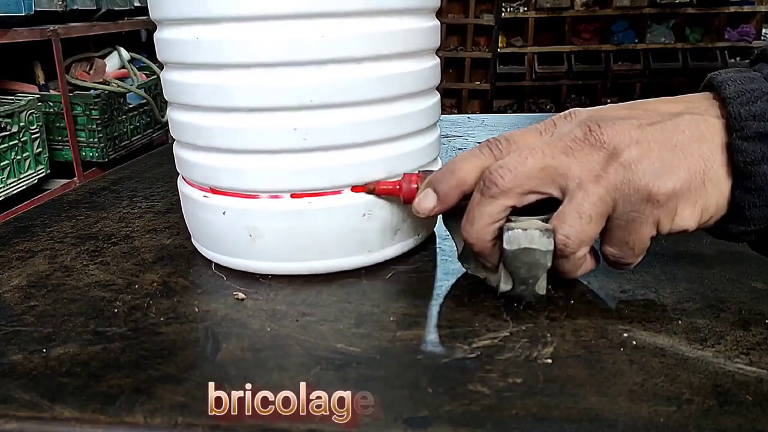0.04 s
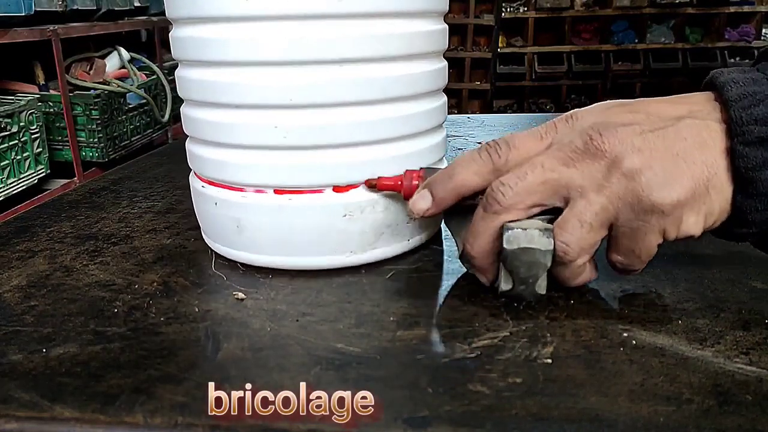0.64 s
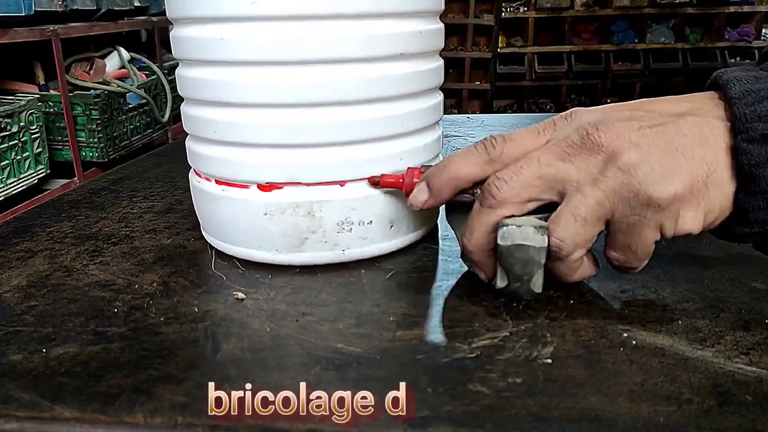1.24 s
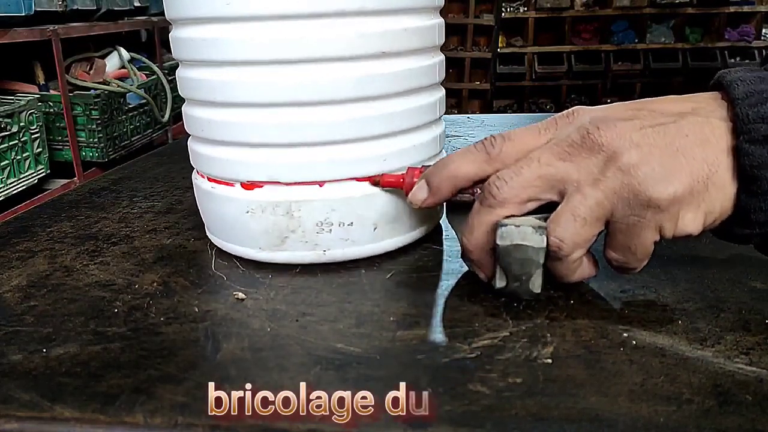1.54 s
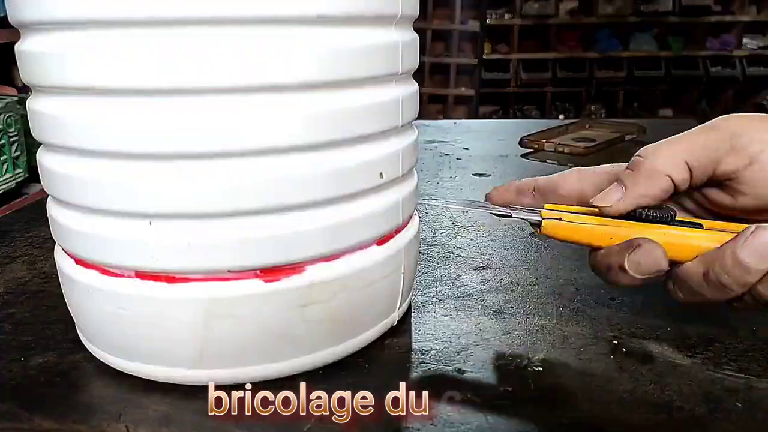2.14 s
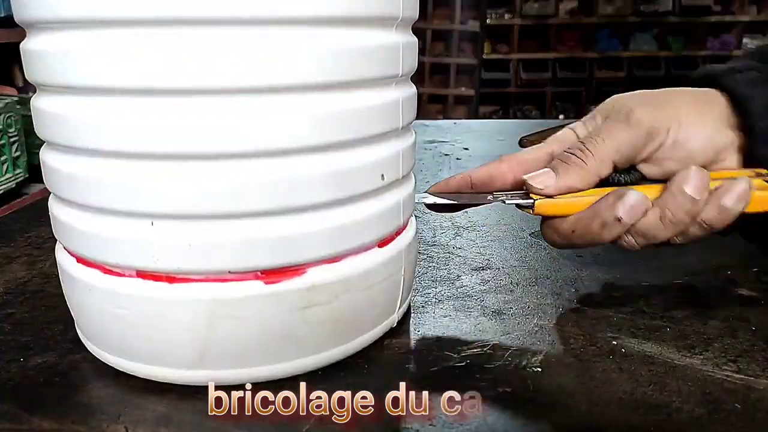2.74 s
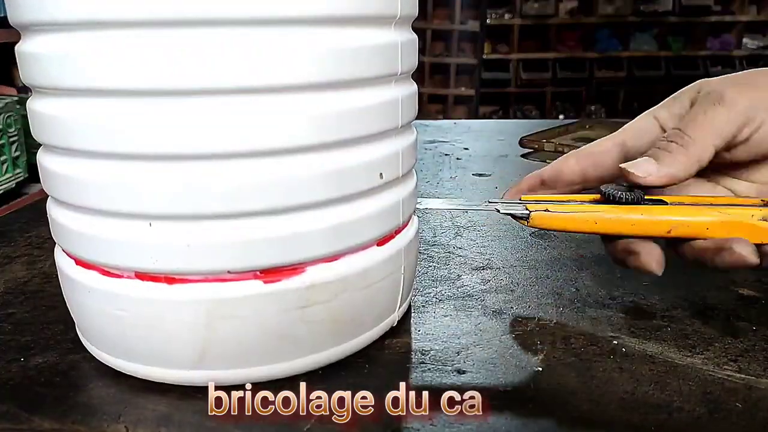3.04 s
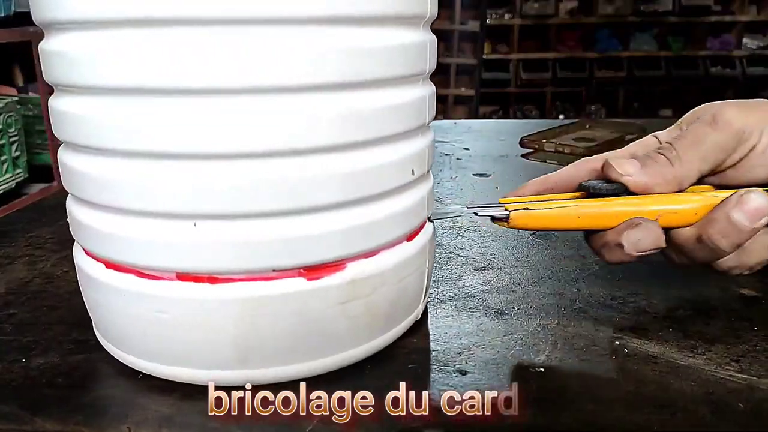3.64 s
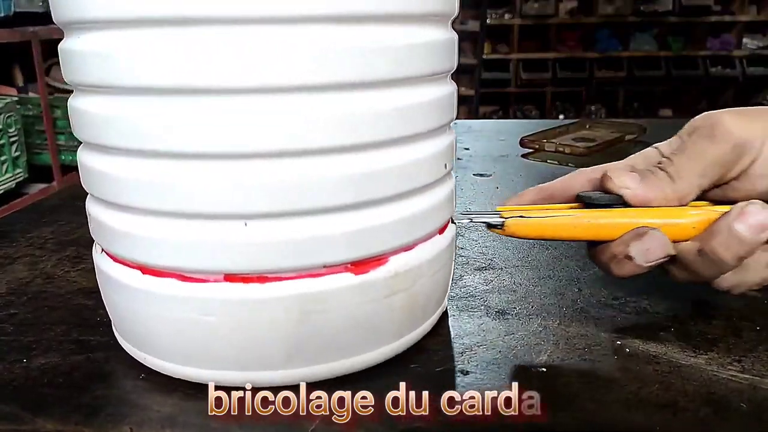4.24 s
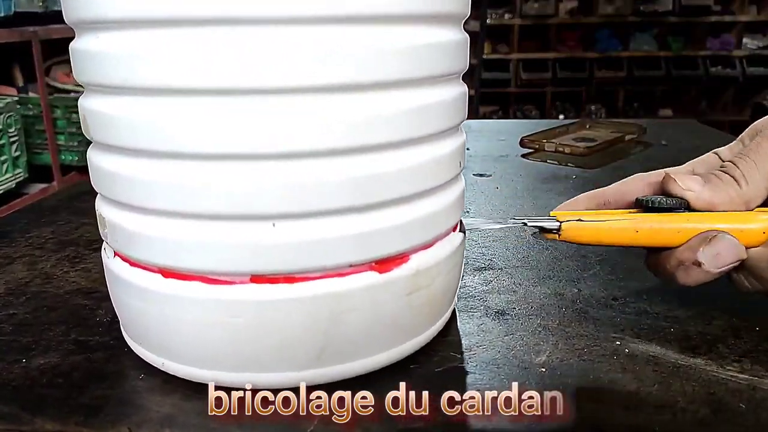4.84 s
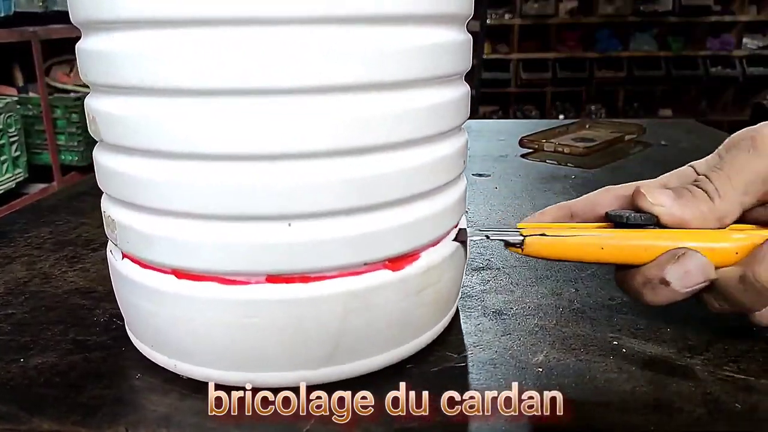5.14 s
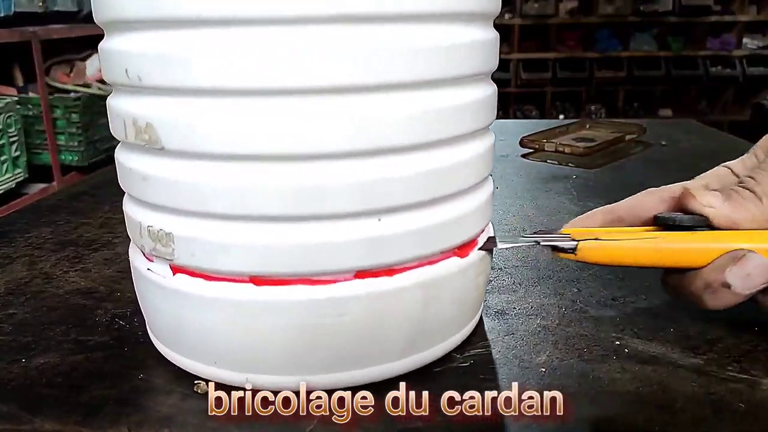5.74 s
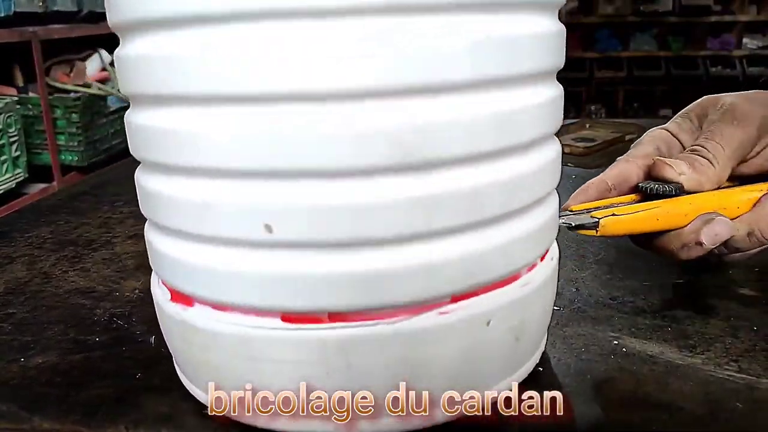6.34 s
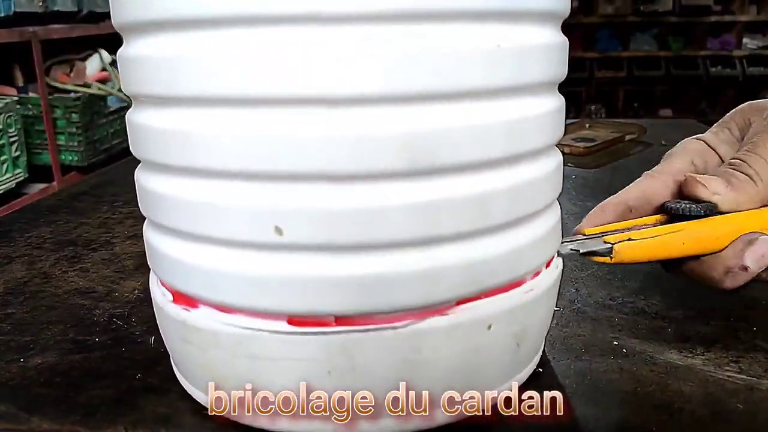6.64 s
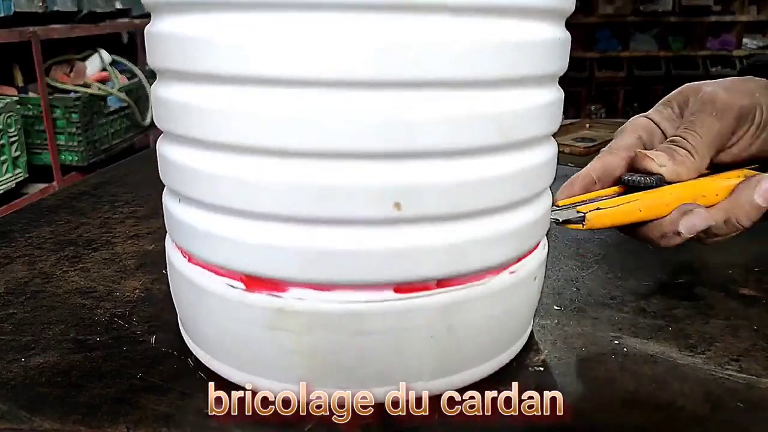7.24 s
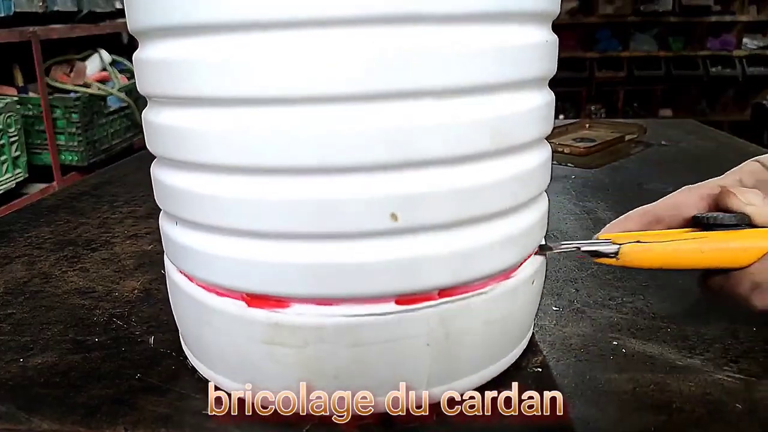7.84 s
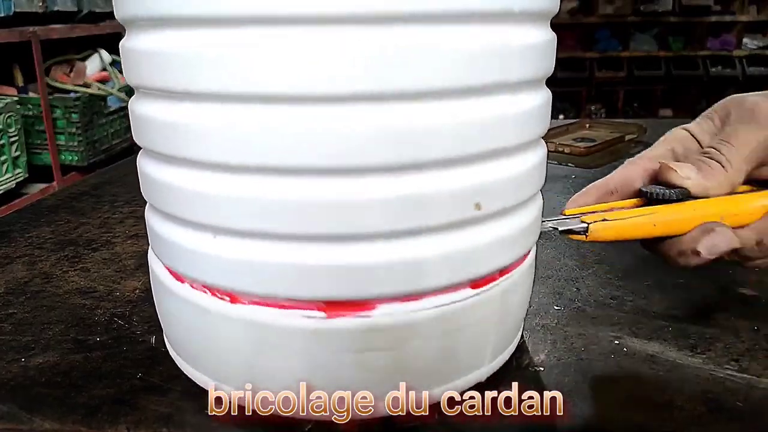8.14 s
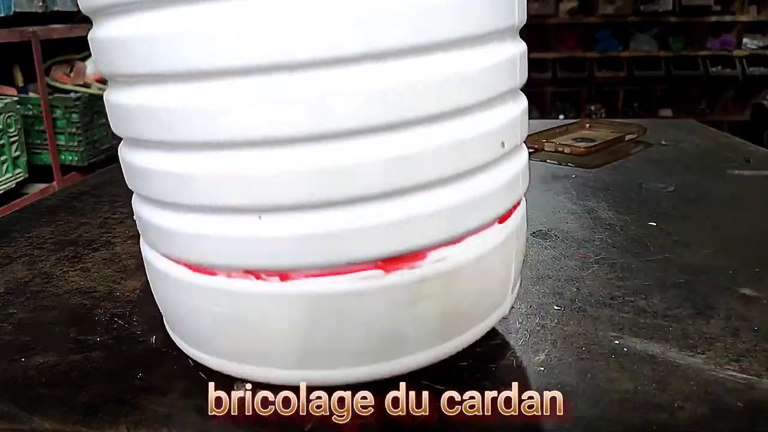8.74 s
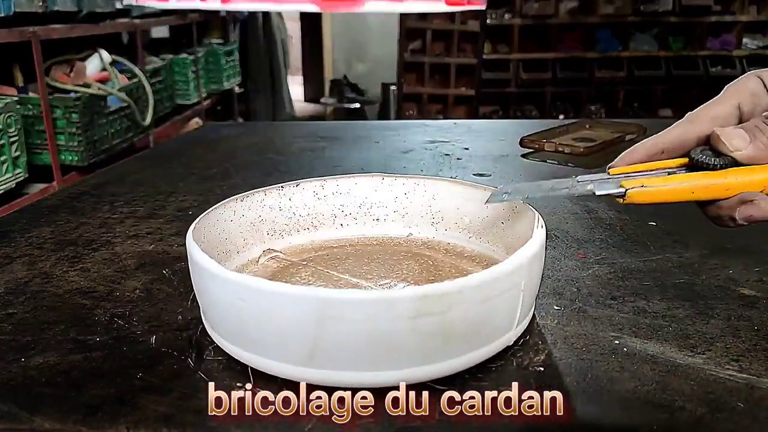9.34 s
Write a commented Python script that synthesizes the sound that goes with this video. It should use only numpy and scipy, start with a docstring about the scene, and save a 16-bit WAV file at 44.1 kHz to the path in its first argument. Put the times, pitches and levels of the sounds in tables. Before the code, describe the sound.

Soft felt-tip strokes on a large plastic bottle give way to a knife scraping and cutting its wall, which crackles and snaps.

```python
"""Soft felt-tip strokes rub round a large ribbed plastic bottle on a workbench; then a utility knife
pierces the wall and saws along the drawn line. The taut wall rings near 1 kHz under quick short
strokes; once the slit opens it goes slack, rings lower and snaps against the blade. The last bridge
cracks through and the top rings hollow as it is lifted off its base. Marker and blade drive the wall's
resonances with tiny slips and kicks, while their friction and cracks reach the ear directly."""
import sys
import numpy as np
from scipy import signal
from scipy.fft import rfft, irfft, next_fast_len
from scipy.io import wavfile
from scipy.ndimage import uniform_filter1d

SR = 44100
rng = np.random.default_rng(int(sys.argv[2]) if len(sys.argv) > 2 else 0)


def persist_wave(psi):
    """Save psi, clipped to +-1, as 16-bit WAV."""
    counts = np.round(np.clip(psi, -1, 1) * 32767).astype(np.int16)
    wavfile.write(sys.argv[1], SR, np.atleast_2d(counts).T)


N = 414099
TIME = np.arange(N) / SR
FFT_SIZE = next_fast_len(N + SR)
HZ = np.maximum(np.arange(FFT_SIZE // 2 + 1) * SR / FFT_SIZE, 1)
KNIFE_FROM_S, SLACK_FROM_S = 2.315, 6.115
CUTOFF_HZ = 16400
HIT_GAIN = np.sqrt(SR / 100)   # gives a unit-energy hit the energy of 10 ms at unit power
# stereo width: f/Hz, side relative to mid/dB
STEREO_WIDTH = [(50, -10.5), (200, -11), (650, -11.5), (1300, -7), (2600, -4), (5000, -1), (14000, -1.5)]


def from_db(db):
    """Decibels to gain."""
    return 10 ** (np.asarray(db) / 20)


def rms_one(x):
    """Scale to unit power."""
    return x / np.sqrt(np.mean(np.abs(x) ** 2) + 1e-20)


def at_hz(points, hz):
    """Read a spectrum on a log-frequency axis."""
    f, level = np.transpose(points)
    return np.interp(np.log(hz), np.log(f), level)


def causal(level_db):
    """Minimum-phase response with this magnitude: nothing sounds early."""
    cepstrum = irfft(np.log(from_db(level_db)))
    half = len(cepstrum) // 2
    cepstrum[1:half] *= 2
    cepstrum[half + 1:] = 0
    return np.exp(rfft(cepstrum))


def through(x, response):
    """Filter a whole track."""
    return irfft(rfft(x, FFT_SIZE) * response, FFT_SIZE)[..., :N]


def coloured(x, spectrum):
    """EQ a track; a white input keeps its power."""
    return through(x, rms_one(causal(at_hz(spectrum, HZ))))


def dying(t60, count):
    """Envelope that falls 60 dB in t60 seconds."""
    return from_db(-60 * np.arange(count) / SR / t60)


def add(track, s, burst):
    """Mix a burst into a track at s seconds."""
    i = max(round(s * SR), 0)
    track[..., i:i + burst.shape[-1]] += burst[..., :max(N - i, 0)]


def ears(mid, side, hz):
    """Left and right spectra: alike in the bass, wider in the treble."""
    width = from_db(at_hz(STEREO_WIDTH, hz))
    return mid + side * width * np.array([[1], [-1]])


def narrow_noise(centre_hz, width_hz, db):
    """Noise held in one resonance."""
    band = 1 / (1 + ((HZ - centre_hz) / (width_hz / 2)) ** 2)
    return from_db(db) * rms_one(through(rng.standard_normal(N), band))


def room_tone():
    """Quiet workshop air; hissier during the first cut, with a faint hum and a passing thin hiss."""
    # colour of the air before and after the first cut: f/Hz, level/dB
    dark_eq = [(30, -5.5), (75, 0), (150, -5), (300, -4.5), (700, -0.5), (1200, -4), (2400, -7),
               (3200, -10), (7000, -15), (13000, -18), (16000, -29)]
    # its colour during that cut: f/Hz, level/dB
    hissy_eq = [(30, -18), (60, -5.5), (125, 0.5), (200, -6.5), (350, -11), (560, -12), (750, -4),
                (1100, -5), (1500, -3), (2200, -4), (10000, -9), (15500, -11.5)]
    mid, side = rfft(rng.standard_normal((2, N)), FFT_SIZE)
    noise = irfft(ears(mid, side, HZ), FFT_SIZE)[:, :N]
    first_cut = (TIME >= KNIFE_FROM_S) & (TIME < SLACK_FROM_S)
    dark = from_db(-69) * coloured(noise * ~first_cut, dark_eq)
    hissy = from_db(-67) * coloured(noise * first_cut, hissy_eq)
    hum = narrow_noise(centre_hz=676, width_hz=14, db=-82) * first_cut
    passing = np.interp(TIME, [2.84, 2.92, 3.08, 3.24], [0, 1, 1, 0])
    thin_hiss = narrow_noise(centre_hz=8950, width_hz=820, db=-69) * passing
    return dark + hissy + hum + thin_hiss


def workshop_reverb(x, build_up_s=0.0054):
    """A short diffuse tail off shelves and bench, dying band by band."""
    # bands of the tail: f/Hz, t60/s, level/dB
    bands = [(306, 0.14, -11), (700, 0.21, -21.5), (1780, 0.12, -11.5), (4520, 0.12, -12.5),
             (10900, 0.11, -12)]
    centres = np.array(bands)[:, 0]
    edges = [150, *np.sqrt(centres[1:] * centres[:-1]), CUTOFF_HZ]
    tail, count = 0, SR // 2
    for (hz, t60, db), low, high in zip(bands, edges, edges[1:]):
        fade = dying(t60, count) * np.clip(TIME[:count] / build_up_s - .5, 0, 1)
        mid, side = rng.standard_normal((2, count)) * fade / np.linalg.norm(fade)
        width = from_db(at_hz(STEREO_WIDTH, hz) + 2.0)
        echoes = from_db(db) * (mid + side * width * [[1], [-1]])
        band = signal.butter(2, [low, high], "band", fs=SR, output="sos")
        tail = tail + signal.sosfilt(band, echoes)
    return through(x, rfft(tail, FFT_SIZE))


def bench_thuds():
    """The bottle is jolted against the bench: dull, fast-dying bursts of noise."""
    # jolts: t/s, level/dB
    jolts = [(3.729, -61), (3.805, -68), (4.141, -65), (4.293, -66), (4.372, -65), (4.627, -64),
             (4.645, -69), (7.166, -64), (7.518, -51.5)]
    out, fade = np.zeros(N), dying(t60=0.036, count=SR // 10)
    band = signal.butter(2, [80, 380], "band", fs=SR, output="sos")
    for s, db in jolts:
        thud = signal.sosfilt(band, rng.standard_normal(len(fade)) * fade)
        add(out, s, from_db(db) * HIT_GAIN * thud / np.linalg.norm(thud))
    return out


def squeaks(waver=0.049, rough_db=2.0):
    """Brief, rough stick-slip tones rise in pitch as the knife is brought up."""
    # squeaks: t/s, length/s, start f/Hz, end f/Hz, level/dB, relative third harmonic/dB
    chirps = [(2.34, 0.024, 1440, 1560, -49.5, -30), (2.36, 0.053, 1556, 1910, -62, -25),
              (2.753, 0.0352, 1603, 1873, -49.5, -5), (2.945, 0.036, 1750, 2000, -60, -20)]
    out = np.zeros(N)
    for s, length, start_hz, end_hz, db, third_db in chirps:
        progress = np.linspace(0, 1, int(length * SR))
        speed, grip = rms_one(uniform_filter1d(rng.standard_normal((2, len(progress))), size=70))
        pitch_hz = (start_hz + (end_hz - start_hz) * progress) * (1 + waver * speed)
        phase = 2 * np.pi * np.cumsum(pitch_hz) / SR
        tone = np.sin(phase) + from_db(third_db) * np.sin(3 * phase)
        add(out, s, from_db(db + rough_db * grip) * np.sin(np.pi * progress) * tone)
    return out


def freed_top(attack_s=0.0023):
    """The open top rings hollow as it slips off its base; each ring swells in softly."""
    # slips of the rim: t/s, level/dB
    releases = [(9.197, -37.5), (9.271, -28)]
    # modes of the open top: f/Hz, level/dB, t60/s
    modes = [(589, -7.5, 0.17), (657, -0.5, 0.18), (752, -3, 0.09), (1482, -4.5, 0.14)]
    out, t = np.zeros(N), TIME[:SR // 4]
    note = sum(from_db(db) * dying(t60, len(t)) * np.sin(2 * np.pi * hz * t) for hz, db, t60 in modes)
    for s, db in releases:
        add(out, s, from_db(db) * note * np.tanh(t / attack_s) ** 2)
    return out


def grains(count, per_s, spread_db=3.0):
    """Tiny slips of uneven size at random moments, as (mid, side) at unit power."""
    sizes = from_db(spread_db * np.minimum(rng.exponential(1, count), 4))
    signs = np.sign(rng.random((2, count)) - .5)
    return rms_one(signs * sizes * (rng.random(count) < per_s / SR))


def contact(burst, tilt, uneven_db, low_hz, high_hz):
    """Give each (mid, side) burst a random uneven tone colour; tilt in dB/octave, stereo out."""
    size = 2 * next_fast_len(burst.shape[-1] // 2 + 512)
    hz = np.maximum(np.fft.rfftfreq(size, 1 / SR), 1)
    octaves = np.log2(np.clip(hz, low_hz, min(high_hz, 12000)) / low_hz)
    knots_hz = np.geomspace(100, SR / 2, 56)
    ripple_db = uneven_db * np.interp(hz, knots_hz, rng.standard_normal(len(knots_hz)))
    mid, side = rfft(burst, size) * causal(tilt * octaves + ripple_db)
    band = (hz > low_hz) & (hz < high_hz)
    band_rms = np.sqrt(np.mean(np.abs(mid[band]) ** 2))
    return irfft(ears(mid, side, hz) / band_rms)


def flex(burst, tilt, uneven_db):
    """The part of a contact that flexes the wall."""
    return contact(burst, tilt, uneven_db, low_hz=250, high_hz=1400)


def radiate(burst, tilt, uneven_db):
    """The part of a contact that is heard directly."""
    return contact(burst, tilt, uneven_db, low_hz=1500, high_hz=16000)


def rubbing(strokes, spectrum, slips_per_s, uneven_db, catch_db=2.5):
    """Each stroke swells and fades over dense small slips; returns wall force and friction noise."""
    force, friction = np.zeros((2, 2, N))
    t = np.arange(-5000, 5000) / SR
    catches = t[::150]   # the tip catches every few ms
    for s, half_s, wall_db, friction_db, tilt in strokes:
        touching = np.abs(t) < 3 * half_s
        swell = np.exp(-(t[touching] / half_s) ** 2 / 2)
        grip = from_db(catch_db * np.interp(t, catches, rng.standard_normal(len(catches))))
        slips = swell * (grip * grains(len(t), slips_per_s))[:, touching]
        start, gain = s + t[touching][0], np.linalg.norm(swell)
        add(force, start, gain * from_db(wall_db) * flex(slips, 0, uneven_db))
        add(friction, start, gain * from_db(friction_db) * radiate(slips, tilt, uneven_db))
    return force, coloured(friction, spectrum)


def gliding(passes, max_db=0, step_s=0.01):
    """A long pass is a chain of overlapping touches: t/s, half length/s, level/dB."""
    for curve in passes:
        times, levels = np.transpose(curve)
        for s in np.arange(times[0], times[-1], step_s):
            yield s, 0.58 * step_s, min(np.interp(s, times, levels), max_db)


def pressed(touches, wall_trim_db, friction_trim_db, firm_tilt, firm_db=-50.5):
    """Turn touches into strokes: more pressure, more treble."""
    return [(s, half_s, db + wall_trim_db, db + friction_trim_db, firm_tilt + 0.15 * (db - firm_db))
            for s, half_s, db in touches]


def marker():
    """The felt tip glides along the line and dabs at it between passes."""
    # tip pressure, one curve a pass: t/s, level/dB
    passes = [
        [(0.25, -63), (0.26, -71), (0.276, -52), (0.298, -48.5), (0.306, -43.5), (0.41, -53), (0.434, -41.5),
         (0.49, -45), (0.518, -67), (0.544, -52.5), (0.56, -69)],
        [(0.745, -73), (0.763, -51.5), (0.805, -55), (0.843, -44.5), (0.877, -51.5), (0.899, -45.5),
         (0.911, -53), (0.953, -52), (0.975, -66), (1.0, -66)],
        [(1.0, -68), (1.01, -54.5), (1.026, -64), (1.064, -39), (1.112, -44.5), (1.126, -56), (1.174, -43),
         (1.23, -45), (1.256, -52), (1.294, -51), (1.34, -78)],
        [(1.6, -74), (1.61, -61), (1.622, -73), (1.718, -51), (1.818, -52), (1.85, -44), (1.874, -50),
         (1.928, -45), (1.962, -53.5), (1.978, -66), (2.05, -64.5)],
        [(2.17, -82), (2.186, -56.5), (2.204, -57), (2.216, -67), (2.288, -46), (2.306, -48), (2.312, -69)],
    ]
    # brief touches: centre t/s, half length/s, level/dB
    dabs = [(0.055, 0.02, -59), (0.204, 0.015, -50.5), (0.584, 0.0079, -61), (0.627, 0.016, -54),
            (0.674, 0.009, -56.5), (1.384, 0.021, -58), (1.459, 0.02, -53.5), (2.297, 0.007, -46.5)]
    # colour of felt on plastic: f/Hz, level/dB
    felt_eq = [(700, -39), (1400, -1), (1800, -2.5), (3300, -3.5), (4700, -2.5), (7000, -5.5),
               (10000, -5.5), (13500, -7.5), (15500, -30)]
    strokes = pressed([*gliding(passes), *dabs], wall_trim_db=-1.94, friction_trim_db=-5.5,
                      firm_tilt=-4.5)
    return rubbing(strokes, felt_eq, slips_per_s=3800, uneven_db=2.5)


def sawing(linger_s=0.004, jam_lag_s=0.0015):
    """Push and pull alternate; the blade jams mid-push and knocks the wall. Returns strokes, knocks."""
    # runs: first push t/s, last pull t/s, cycles, wall/dB, rasp/dB, swell over the run/dB, knock/dB
    runs = [(3.55, 3.816, 4, -52.5, -50.5, 8, -51.5), (3.974, 4.025, 1, -57, -63, -11, -58.5),
            (4.073, 4.114, 1, -53.5, -54.5, 2.5, -55), (4.148, 4.425, 4, -52.5, -51, 5.5, -51),
            (4.469, 4.681, 3, -48, -49, 1, -45), (4.868, 4.999, 2, -53.5, -50, -5.5, -53),
            (5.041, 5.511, 6, -54, -51.5, 0, -43.5), (5.552, 5.674, 2, -53.5, -46.5, -9.5, -59),
            (5.702, 5.823, 2, -50, -50, -2.5, -44.5), (5.867, 5.998, 2, -49.5, -47.5, 0.5, -47.5),
            (6.034, 6.094, 1, -49, -42.5, 2, -44)]
    # each half of a cycle: half length/s, wall trim/dB, rasp trim/dB, rasp tilt/(dB/octave)
    push, pull = (0.0095, -0.7, -1.4, -4.7), (0.009, -0.3, 0.4, -3.1)
    knock_crack_db, knock_tilt = -5.5, -9.5
    strokes, knocks = [], []
    for first, last, cycles, wall_db, rasp_db, swell_db, knock_db in runs:
        for k, progress in enumerate(np.linspace(0, 1, 2 * cycles)):
            pulling = k % 2
            s = first + progress * (last - first) + pulling * linger_s   # the hand lingers after a push
            effort_db = swell_db * (progress - .5)
            half_s, wall_trim, rasp_trim, tilt = pull if pulling else push
            levels = wall_db + wall_trim + effort_db, rasp_db + rasp_trim + effort_db
            strokes.append((s, half_s, *levels, tilt))
            if not pulling:
                hit_db = knock_db + effort_db
                knocks.append((s + jam_lag_s, hit_db, hit_db + knock_crack_db, knock_tilt))
    return strokes, knocks


def blade(saw_strokes):
    """The knife rasps through the plastic in saw strokes, long slices and single scrapes."""
    # blade force, one curve for each slice of the slack wall: t/s, level/dB
    slices = [
        [(6.265, -50), (6.331, -41), (6.341, -28), (6.369, -53), (6.383, -39.5), (6.5, -61)],
        [(7.295, -70), (7.309, -48), (7.355, -42.5), (7.361, -31), (7.379, -32), (7.48, -64.5)],
        [(8.285, -76), (8.303, -45), (8.331, -39.5), (8.437, -52.5), (8.443, -46.5), (8.49, -61.5)],
    ]
    # scrapes of blade or cut edges: centre t/s, half length/s, wall/dB, rasp/dB
    scrapes = [(3.208, 0.011, -64, -59), (3.463, 0.014, -54, -50), (3.51, 0.023, -67, -60),
               (3.844, 0.023, -57.5, -57), (3.937, 0.008, -62, -54.5), (4.803, 0.019, -59.5, -46.5),
               (6.148, 0.011, -42, -45.5), (6.205, 0.017, -51.5, -55.5), (6.238, 0.0097, -42, -45.5),
               (6.58, 0.039, -50.5, -53.5), (6.687, 0.011, -43, -47), (6.756, 0.014, -44.5, -52),
               (6.84, 0.018, -43.5, -45.5), (7.11, 0.018, -44, -48.5), (7.16, 0.011, -49, -54),
               (7.259, 0.016, -51.5, -56), (7.545, 0.029, -45, -49.5), (7.658, 0.016, -47, -52.5),
               (7.73, 0.017, -56.5, -61.5), (7.813, 0.017, -49, -51), (7.862, 0.022, -51.5, -58.5),
               (7.945, 0.015, -48, -55.5), (8.016, 0.022, -49, -59.5), (8.097, 0.013, -48, -54),
               (8.16, 0.018, -48.5, -55.5), (8.246, 0.026, -58, -60.5), (8.596, 0.012, -55.5, -57),
               (8.665, 0.0076, -45, -52.5), (8.928, 0.016, -41, -46), (9.215, 0.0084, -42.5, -47.5),
               (9.3, 0.02, -41, -41)]
    # colour of the rasp: f/Hz, level/dB
    rasp_eq = [(700, -21.5), (1400, -1), (1700, -2), (2400, 1.5), (3300, 2), (5000, 0.5), (7500, 3.5),
               (10000, 1), (13000, -0.5), (15500, -9.5)]
    touches = gliding(slices, max_db=-40.5)   # capped: pushed harder, plastic snaps instead of rasping
    strokes = saw_strokes + pressed(touches, wall_trim_db=-3, friction_trim_db=-3, firm_tilt=-5)
    for s, half_s, wall_db, rasp_db in scrapes:
        tilt = -4.8 + 0.44 * (rasp_db - wall_db)   # the less it flexes the wall, the brighter it is
        strokes.append((s, half_s, wall_db, rasp_db, tilt))
    return rubbing(strokes, rasp_eq, slips_per_s=4200, uneven_db=3.5)


def burrs(strokes, scatter_s=0.009, trim_db=-6.5, tilt=-4.5):
    """Somewhere in each saw stroke a burr breaks off with a small bright snap."""
    delays = scatter_s * rng.standard_normal(len(strokes))
    return [(s + delay, wall_db + trim_db, rasp_db + trim_db, tilt)
            for (s, _, wall_db, rasp_db, _), delay in zip(strokes, delays)]


def snaps(saw_snaps, lead_in_s=0.002, lead_in_db=-13, right_bias_db=1.5):
    """A faint, brief swell leads into each snap, which kicks the wall and scatters round the ribs."""
    # the wall catches and lets go: t/s, wall/dB, crack/dB, crack tilt/(dB/octave)
    wall_snaps = [(0.58, -59, -62, -10), (0.6602, -55, -51, -11), (0.731, -54.5, -70, -9),
                  (1.0615, -43, -51, -5), (1.3715, -46.5, -60, -20), (1.455, -60, -57, -7),
                  (1.497, -63, -55.5, -5.5), (2.257, -52, -57, -3), (2.7893, -64, -45.5, -1),
                  (2.997, -55.5, -50, -11), (3.0152, -54, -50.5, -5.5), (3.294, -72, -45, -6),
                  (3.3881, -32.5, -30, -10.5), (3.4476, -40, -47, -12.5), (3.654, -46, -46, -5.5),
                  (3.728, -49.5, -46, -4.5), (3.8054, -56, -43.5, -5), (3.8218, -41.5, -52, -12),
                  (3.8371, -60, -40, -7), (3.9183, -56, -47, -11), (4.0053, -76, -49.5, -3.5),
                  (4.018, -72, -57, 1), (4.1413, -55, -47.5, -7), (4.2925, -50, -49, -5.5),
                  (4.372, -49.5, -47.5, -8), (4.456, -52, -48, -5.5), (4.4747, -48.5, -45.5, -12),
                  (4.627, -48, -47, -4.5), (4.861, -47.5, -50, -5), (4.8775, -42.5, -46.5, -4),
                  (5.7438, -50, -43.5, -10), (5.8757, -47, -44.5, -10.5), (5.909, -46.5, -54, -14),
                  (5.941, -43, -44, -7.5), (5.9595, -44, -45, -15), (5.9972, -43.5, -47, -6.5),
                  (6.0343, -41.5, -39, -16.5), (6.0457, -44, -40.5, -14.5), (6.2329, -36.5, -41, -7.5),
                  (6.3419, -45, -28, -4), (6.3849, -60, -35, -6), (6.5326, -44, -44, -14.5),
                  (6.546, -37.5, -33.5, -7.5), (6.5939, -38.5, -44, -21), (6.7606, -41, -39, -17),
                  (6.8969, -37.5, -39, -16.5), (7.0475, -37.5, -39.5, -14.5), (7.0757, -39.5, -30.5, -5),
                  (7.1662, -30, -35.5, -13), (7.2592, -40, -50.5, -7), (7.364, -39, -30, 3.5),
                  (7.3828, -38.5, -30.5, -5.5), (7.5007, -41.5, -46, -9.5), (7.518, -32.5, -32.5, -5.5),
                  (7.551, -45, -34.5, -6), (7.726, -41, -48.5, -12), (7.8258, -42.5, -63, -10),
                  (7.8665, -37.5, -43.5, -14), (7.9156, -46, -50.5, -20), (7.9811, -56, -47, -3),
                  (7.9995, -36.5, -39.5, -14.5), (8.0682, -38, -27, -2), (8.1463, -35.5, -41, -9),
                  (8.167, -41, -52, -12), (8.2233, -46.5, -57, -9), (8.4399, -50, -44.5, -15),
                  (8.4998, -39, -39, -4.5), (8.6106, -36, -26, -2.2), (8.6793, -25.5, -22.5, -6),
                  (8.6891, -29, -31.5, -5.5), (8.699, -41, -41, -2.5), (8.8478, -36.5, -28, -1.9),
                  (8.9166, -36, -32, -1), (9.1957, -37, -38.5, -10), (9.202, -36, -41, -2.5),
                  (9.2662, -40, -28.5, -0.5), (9.272, -34, -30, -2), (9.3035, -49, -35, -2.5),
                  (9.3281, -45.5, -42.5, -7)]
    # colour of a crack: f/Hz, level/dB
    crack_eq = [(700, -24.5), (1300, -4), (1650, -1.5), (2100, -4), (2600, 1), (3400, 0.5), (5100, 6),
                (7000, 2), (9500, 3), (12500, 3), (15500, -6.5)]
    force, crack = np.zeros((2, 2, N))
    lead = SR // 100
    lead_in = from_db(lead_in_db) * np.exp(-TIME[lead:0:-1] / lead_in_s)
    envelope = np.r_[lead_in, dying(t60=0.031, count=SR // 10)]
    kick = signal.unit_impulse(len(envelope), lead) * np.array([[1], [0]])   # mid only
    pan = from_db(np.array([[-right_bias_db], [right_bias_db]]) / 2)
    for s, wall_db, crack_db, tilt in wall_snaps + saw_snaps:
        scatter = grains(len(envelope), per_s=12000) * envelope
        scatter /= np.linalg.norm(scatter[0])
        shove = flex(0.68 * kick + 0.66 * scatter, tilt=0.5, uneven_db=2.0)
        click = radiate(scatter + 0.4 * kick, tilt, uneven_db=2.5)
        add(force, s - lead / SR, HIT_GAIN * from_db(wall_db) * shove)
        add(crack, s - lead / SR, HIT_GAIN * from_db(crack_db) * pan * click)
    return force, coloured(crack, crack_eq)


def ring(force, modes):
    """Parallel wall resonances of alternating sign; little radiates below the lowest."""
    response = sum((-1) ** k * from_db(db) / (1 + 1j * (HZ ** 2 - hz ** 2) / (HZ * width))
                   for k, (hz, width, db) in enumerate(modes))
    lowest_hz = modes[0][0]
    radiation = [(0.19 * lowest_hz, -14), (1.17 * lowest_hz, 0), (2600, 0), (8000, -14)]
    return through(force, rms_one(response * causal(at_hz(radiation, HZ))))


def bottle_wall(force):
    """The wall rings with the modes of its present state: whole, taut or slack."""
    # modes of the uncut bottle: f/Hz, bandwidth/Hz, level/dB
    whole_modes = [(317, 190, -15), (540, 114, -8), (664, 63, 1.5), (748, 86, -0.5), (1073, 190, -7.5),
                   (1337, 140, -18)]
    # held taut by the blade: f/Hz, bandwidth/Hz, level/dB
    taut_modes = [(544, 73, -9), (654, 71, -12), (841, 94, -5.5), (932, 61, -2), (1126, 116, 0.5),
                  (1235, 116, -4), (1900, 130, -20), (2620, 57, -22)]
    # slit open: f/Hz, bandwidth/Hz, level/dB
    slack_modes = [(193, 82, -26), (310, 79, -11), (498, 133, -5), (633.5, 85, 1.5), (733, 108, 0.5),
                   (907, 120, -6.5), (1113, 174, -6.5), (1390, 400, -11.5)]
    whole, slack = TIME < KNIFE_FROM_S, TIME >= SLACK_FROM_S
    states = [(whole, whole_modes), (~(whole | slack), taut_modes), (slack, slack_modes)]
    return sum(ring(force * active, modes) for active, modes in states)


def scene():
    """Marker, blade and snaps drive one wall; their friction and cracks radiate directly."""
    saw_strokes, knocks = sawing()
    marker_force, rub = marker()
    blade_force, rasp = blade(saw_strokes)
    snap_force, crack = snaps(knocks + burrs(saw_strokes))
    left, right = bottle_wall(marker_force + blade_force + snap_force) + rub + rasp
    bottle = np.array([np.roll(left, 2), right]) * from_db([[-.4], [.4]])   # right: sooner and louder
    direct = bottle + crack + squeaks() + bench_thuds() + freed_top()
    return direct + workshop_reverb(direct.mean(axis=0)) + room_tone()


def record(dry):
    """A steep low-pass takes off the highest treble."""
    return signal.sosfilt(signal.ellip(10, .1, 80, CUTOFF_HZ, fs=SR, output="sos"), dry)


dry = scene()
out = record(dry)
persist_wave(out)
```